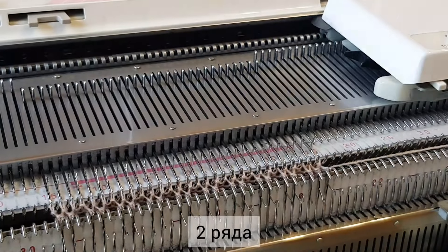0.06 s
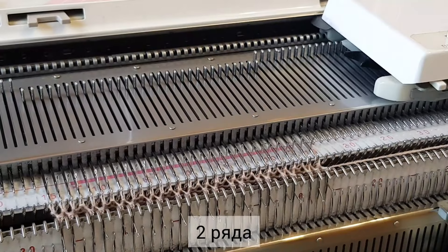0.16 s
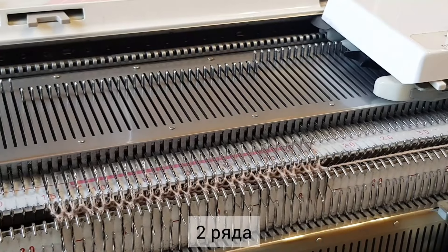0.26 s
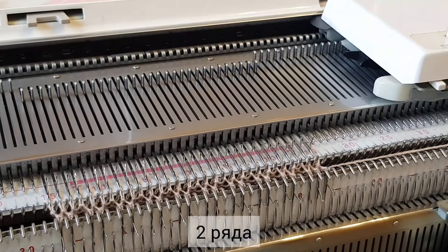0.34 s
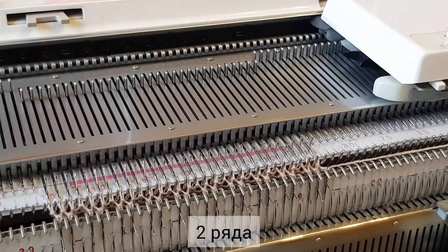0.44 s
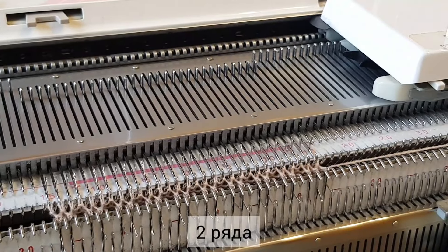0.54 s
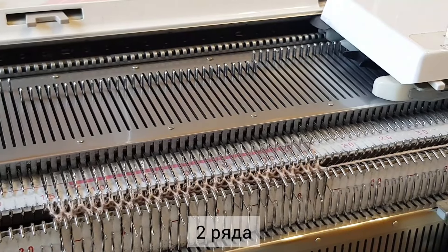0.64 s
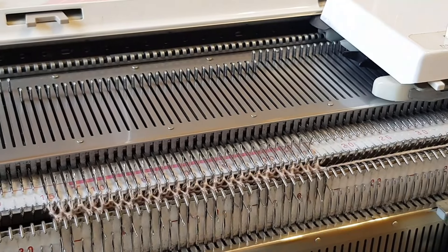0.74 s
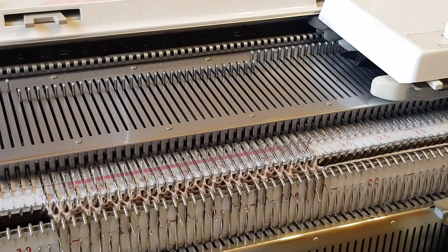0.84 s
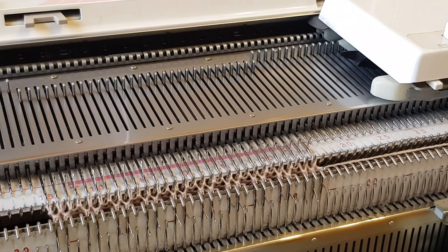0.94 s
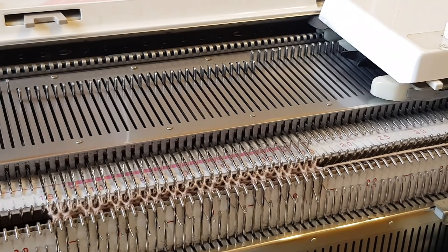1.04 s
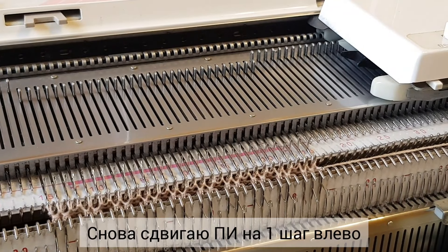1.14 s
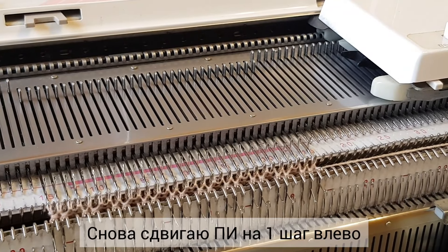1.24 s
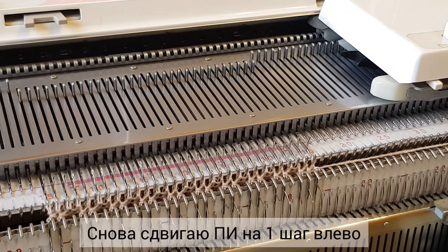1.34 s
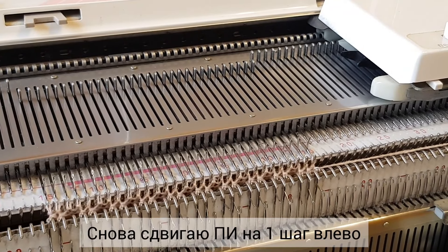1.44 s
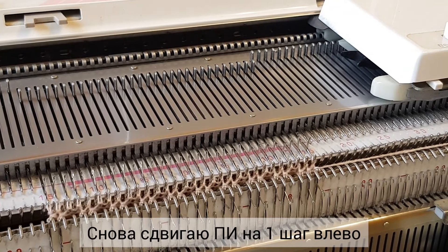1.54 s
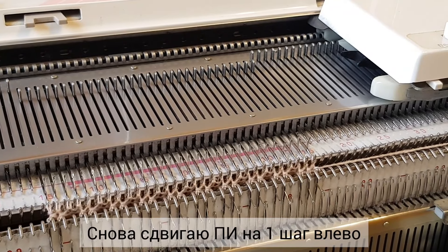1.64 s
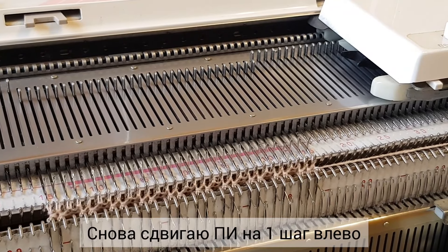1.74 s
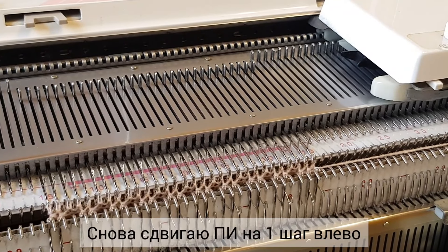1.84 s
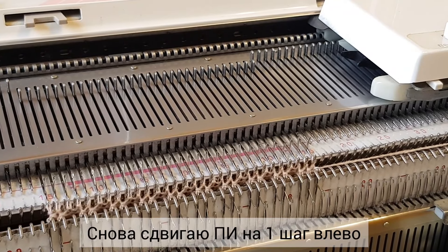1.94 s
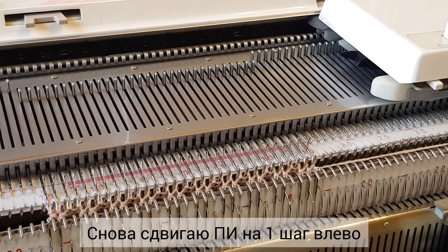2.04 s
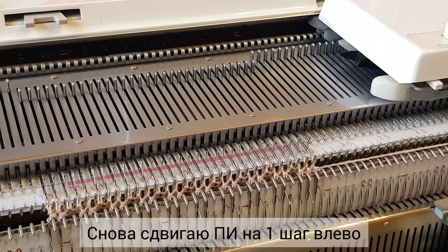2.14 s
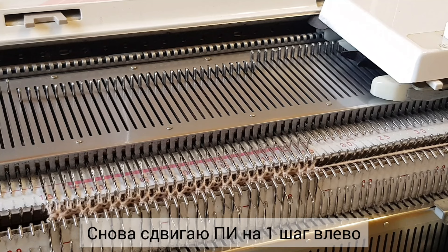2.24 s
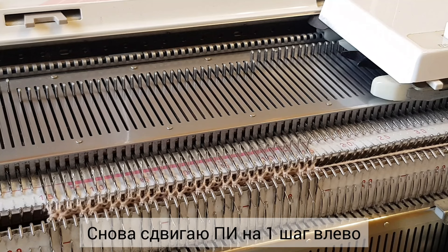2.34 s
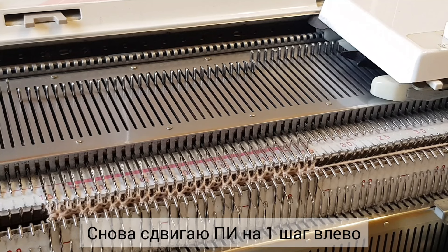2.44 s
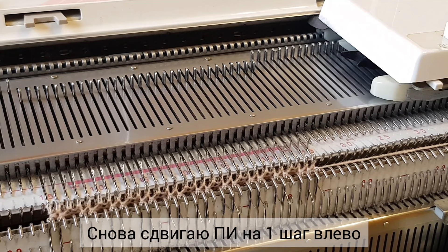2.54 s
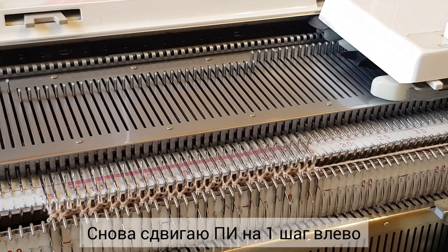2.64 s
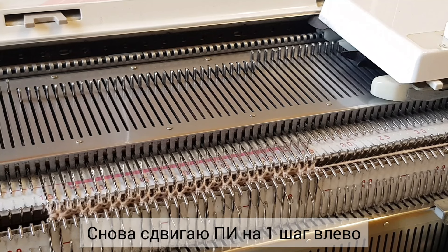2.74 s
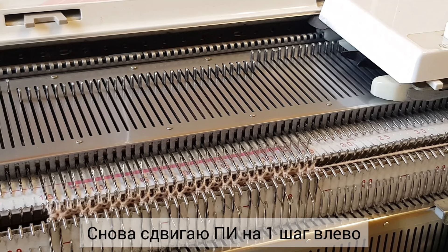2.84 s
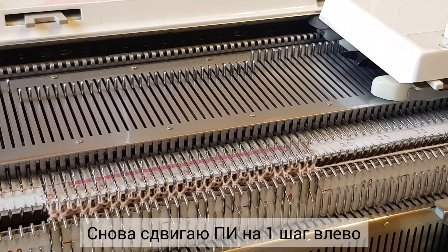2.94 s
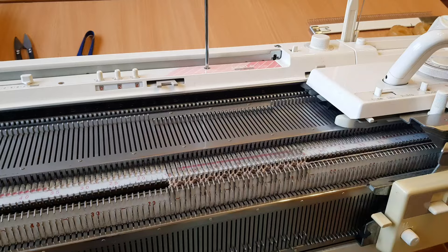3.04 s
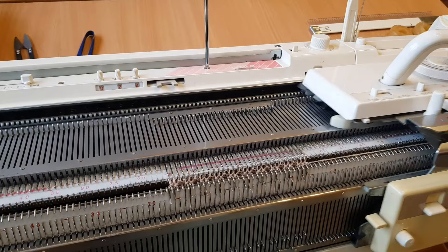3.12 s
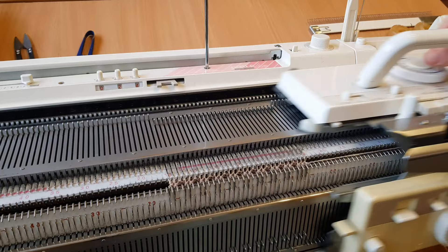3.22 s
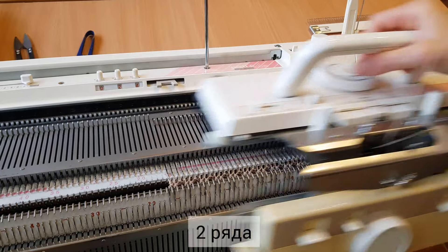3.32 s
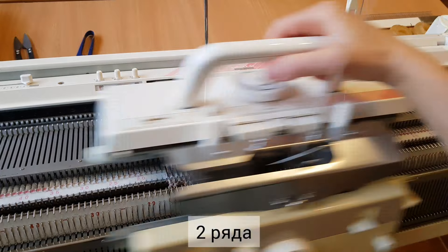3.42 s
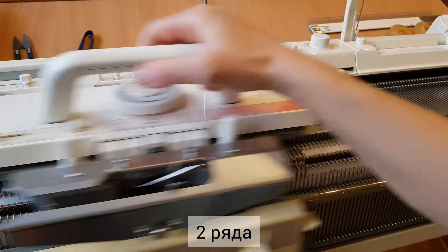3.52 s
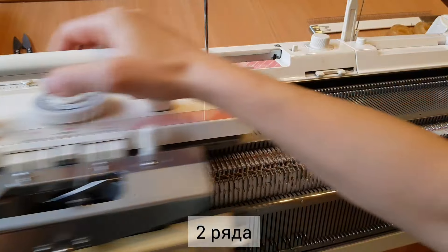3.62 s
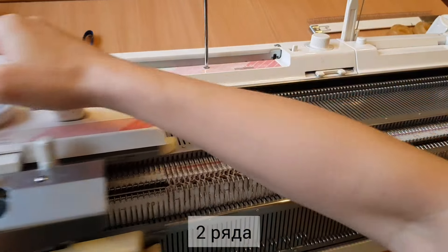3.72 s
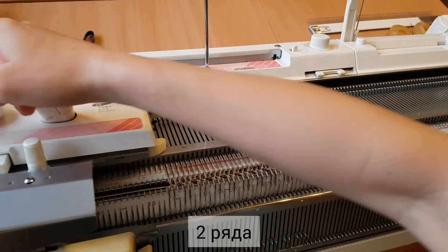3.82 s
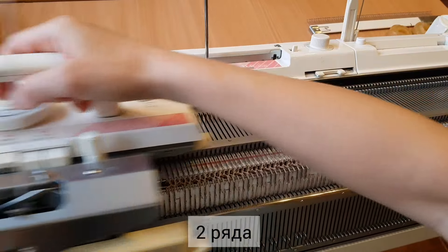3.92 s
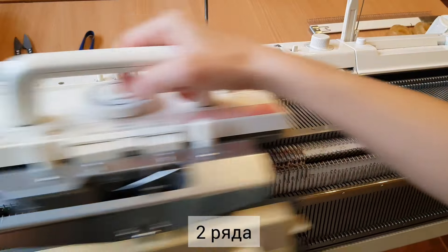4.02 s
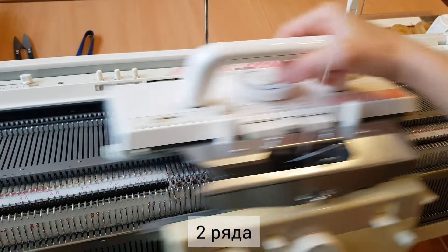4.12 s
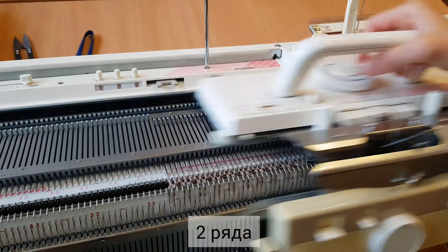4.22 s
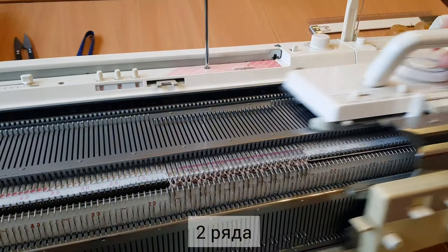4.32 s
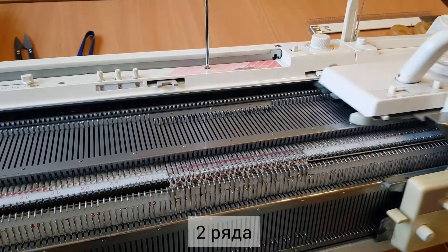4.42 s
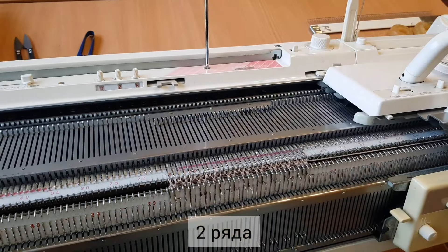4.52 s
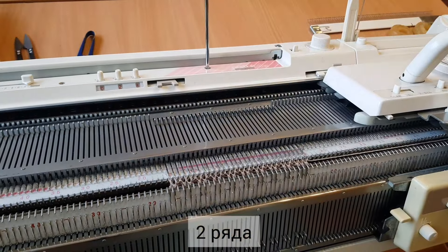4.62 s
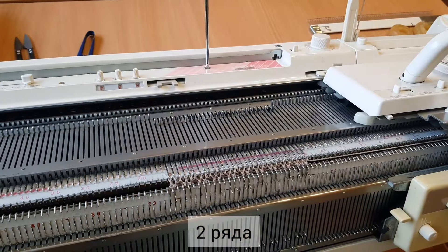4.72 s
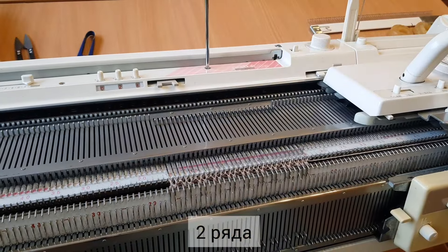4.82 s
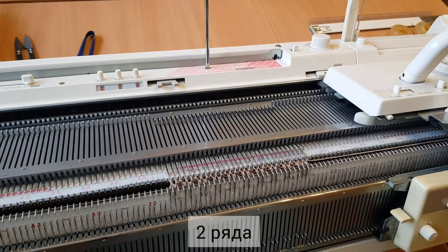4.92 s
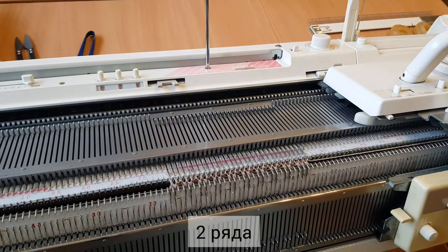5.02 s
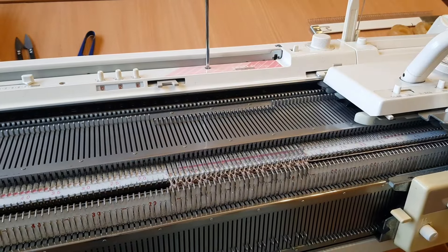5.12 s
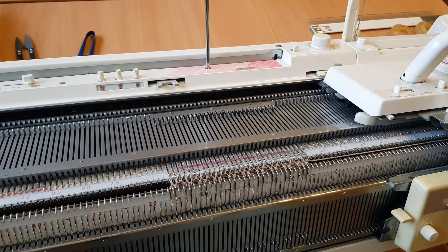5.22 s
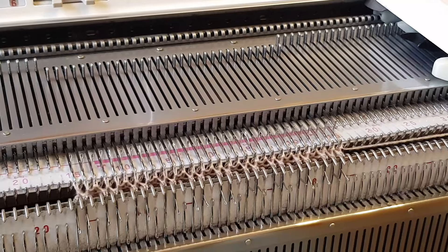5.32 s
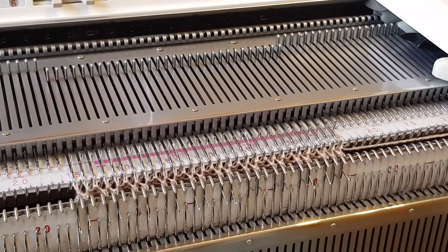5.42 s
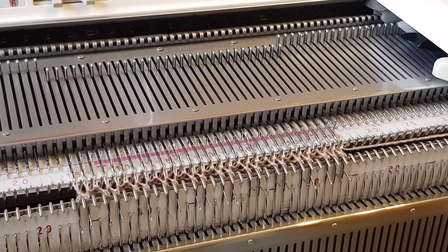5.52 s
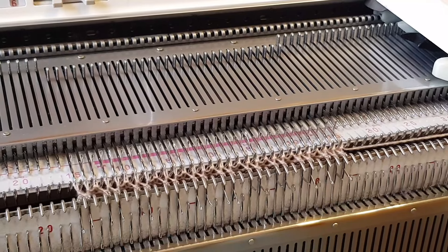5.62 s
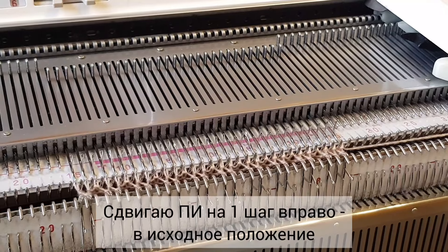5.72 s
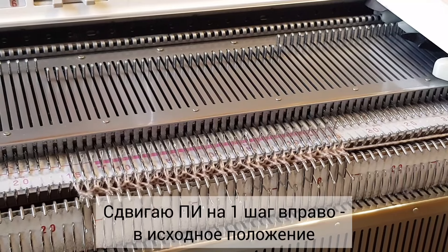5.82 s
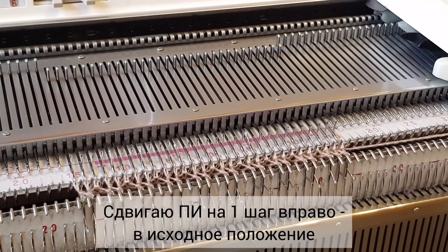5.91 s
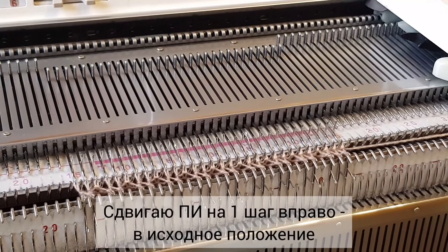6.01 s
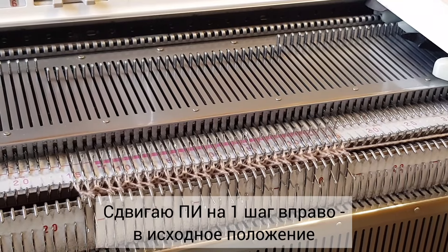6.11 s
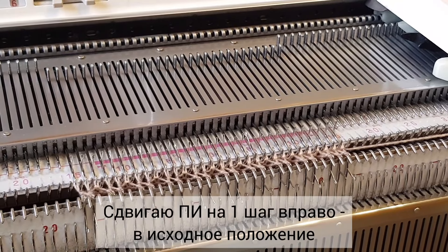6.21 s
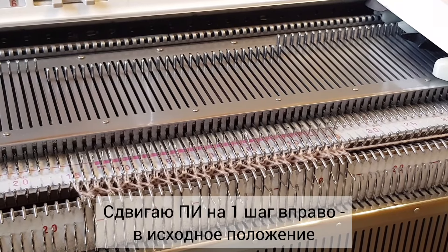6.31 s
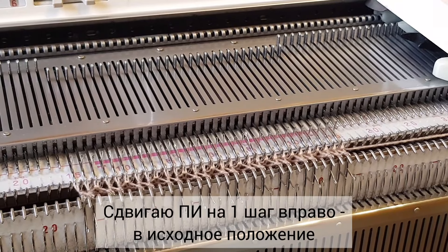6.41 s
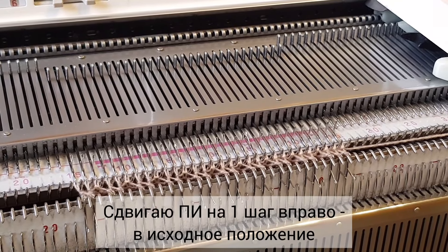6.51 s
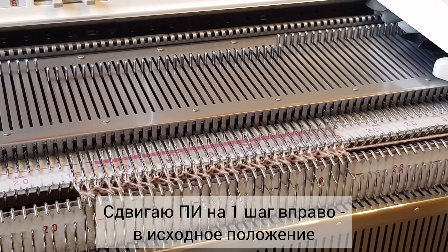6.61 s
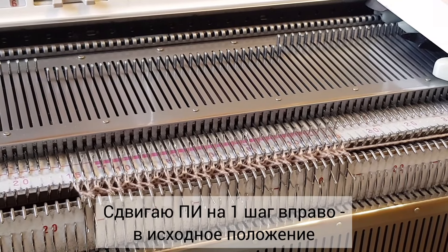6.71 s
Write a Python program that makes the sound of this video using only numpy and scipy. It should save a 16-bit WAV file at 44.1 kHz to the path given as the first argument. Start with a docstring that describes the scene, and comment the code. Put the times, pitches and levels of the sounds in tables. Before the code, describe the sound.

A knitting machine's bed clunks over one notch, its carriage rasps loudly across and back, then a fainter clunk follows in a quiet room.

```python
"""A double-bed knitting machine in a quiet room, close to a microphone with two ports.
The carriage runs out its last pass, then crosses and returns: random needle contacts ring steel cams and shell,
and shaken resonators make the rumble of the beds. Latches tick, and two close sines ring on as a spring.
Before and after the two full passes the bed is racked one notch: decaying noise and struck modes make the clunk.
Room tone and a late drone lie behind; three silences of about 40 ms part four stretches of differing room tone."""
import sys
import numpy as np
from scipy import signal
from scipy.fft import rfft, irfft, next_fast_len
from scipy.io import wavfile
from scipy.ndimage import uniform_filter1d

SR = 44100
rng = np.random.default_rng(int(sys.argv[2]) if len(sys.argv) > 2 else 0)


def store_wav(level_fs):
    """Save 16-bit WAV to argv[1]."""
    pcm = np.round(np.clip(np.atleast_2d(level_fs), -1, 1) * 32767)
    wavfile.write(sys.argv[1], SR, pcm.T.astype(np.int16))


N = 298097
TIME = np.arange(N) / SR   # s

# Colour of a needle butt hitting a steel cam. Each row: frequency in Hz, level in dB per Hz.
NEEDLE_COLOUR = [(1500, -14), (2400, -5), (3250, -3), (3800, -9), (4500, -5), (5050, -5), (6700, -9),
                 (8100, -10.5), (9400, -3.5), (11800, -2.5), (13500, -2), (16000, -5)]
# Modes of the two long needle beds. Each row: frequency in Hz, level in dB, t60 in seconds when struck.
BED_MODES = [(54, -6, .5), (70, -8, 0.43), (90.76, -8.5, .25), (123.5, 1, 0.35), (170, -1, 0.35),
             (203.3, -2, 0.53), (277, -9.5, .4), (334, -10.5, 0.36), (382.4, -11, .35), (455, -17, 0.3),
             (554, -20.5, .28), (783, -18.5, .3), (1210, -25, .25), (1790, -30, 0.29), (2094, -28.5, .22),
             (2490, -25.5, 0.22)]
# Passes of the carriage, the first already ending. Each row: sets off, meets the needles, hardest push,
# leaves the needles and stops, all in seconds; rattle in dB on setting off, running free and at the push;
# build-up in dB per second, deepest rumble in seconds, rumble in dB.
CARRIAGE_PASSES = [(-0.5, -0.38, -0.3, -0.15, 0.075, -70, -40, -19, 80, -0.2, -28),
                   (3.17, 3.382, 3.457, 3.668, 3.835, -71, -35.5, -18, 62, 3.612, -28.5),
                   (3.935, 4.039, 4.128, 4.26, 4.48, -57, -47, -17.2, 125, 4.15, -31)]


def from_db(db):
    """Decibels to gain."""
    return 10 ** (np.asarray(db) / 20)


def at_hz(points, hz):
    """Read a table along log frequency."""
    known, values = np.transpose(points)
    return np.interp(np.log(np.maximum(hz, 1)), np.log(known), values)


def in_time(rows):
    """One curve for each column after the times."""
    s, *columns = np.transpose(rows)
    return [np.interp(TIME, s, c) for c in columns]


def past(seconds):
    """Time gone by, zero while still to come."""
    return np.maximum(seconds, 0)


def dying(t, t60):
    """Exponential decay that has lost 60 dB after t60 seconds."""
    return np.exp(-np.log(1000) * t / t60)


def impulses(times, db):
    """One click at each time."""
    out = np.zeros(N)
    places = np.clip(np.asarray(times) * SR, 0, N - 1).astype(int)
    np.add.at(out, places, from_db(db))
    return out


def convolve(x, response):
    """Play a mono signal through a stereo response."""
    return np.array([signal.oaconvolve(x, r)[:N] for r in response])


def noise(spectrum, size=N):
    """Stereo noise of rms 1, most alike at the two ports in the bass, with skirts beyond its spectrum."""
    # Likeness of the two microphone ports. Each row: frequency in Hz, correlation from 0 to 1.
    likeness = [(60, .975), (125, .93), (250, .83), (550, .3), (1200, .2), (2500, 0), (16000, 0)]
    n = next_fast_len(size)
    hz = np.arange(n // 2 + 1) * SR / n
    mid, side = rfft(rng.standard_normal((2, n)))
    alike = np.clip(at_hz(likeness, hz), -1, 1)
    both = np.sqrt(1 + alike) * mid + np.sqrt(1 - alike) * side * [[1], [-1]]
    low_skirt = np.minimum(hz / spectrum[0][0], 1) ** 2
    high_skirt = np.maximum(hz / spectrum[-1][0], 1) ** 2
    shape = low_skirt / high_skirt * from_db(at_hz(spectrum, hz))
    out = irfft(both * shape, n)[:, :size]
    return out / out.std()


def impact(spectrum, t60, room_db):
    """A contact rings the crowded modes of the metal as decaying noise; the room dies at its own rate per band."""
    # Decay of the room. Each row: frequency in Hz, t60 in seconds.
    room_t60 = [(100, .45), (500, .5), (2500, 0.36), (6000, 0.23), (14000, 0.29)]
    t = TIME[:SR * 2 // 3]
    hz = np.arange(len(t) // 2 + 1) * SR / len(t)
    diffuse, tail = rfft(noise(spectrum, size=len(t))), 0
    centres, decays = np.transpose(room_t60)
    # overlapping bands that add up to the whole spectrum
    for share, decay in zip(np.eye(len(centres)), decays):
        band = irfft(diffuse * at_hz(np.c_[centres, share], hz), len(t))
        tail = tail + band * dying(t, decay)
    direct = noise(spectrum, size=len(t)) * dying(t, t60)
    onset = 1 - np.exp(-t / 0.0092)   # the room answers gradually
    return direct + from_db(room_db) * tail * onset


def ring(clicks, hz, t60):
    """A two-pole resonator: a unit click sets a decaying sine of height 1 ringing."""
    r, w = np.exp(-np.log(1000) / (t60 * SR)), 2 * np.pi * hz / SR
    # the tiny offset keeps the filter clear of slow, vanishing numbers
    return signal.lfilter([0, np.sin(w)], [1, -2 * r * np.cos(w), r * r], clicks + 1e-18)


def struck(times, db, modes, vary_db, spread):
    """Every blow stirs each mode with its own strength; one port hears it up to spread seconds later."""
    out = np.zeros((2, N))
    for k, (hz, mode_db, t60) in enumerate(modes):
        blow_db = db + mode_db + vary_db * rng.standard_normal(len(times))
        tone = ring(impulses(times, blow_db), hz, t60) * (-1) ** k
        lag = int(rng.random() * spread * SR)
        out[k % 2] += tone
        out[1 - k % 2, lag:] += tone[:N - lag]
    return out


def rattle(per_s, spectrum, t60, room_db, uneven_db, count):
    """Random contacts dealt to several cams that each ring in their own way; rms about 1."""
    sizes = from_db(uneven_db * np.clip(rng.standard_normal(N), -2, 2))
    contacts = (rng.random(N) < per_s / SR) * rng.choice([-1, 1], N)
    # divided by the contact rate, so that density alone does not change the level
    clicks = contacts * sizes / np.sqrt(np.mean(sizes ** 2) * per_s / SR)
    cam = rng.integers(0, count, N)
    out = 0
    for k in range(count):
        response = impact(spectrum, t60, room_db)
        response = response / np.sqrt(np.sum(response ** 2) / 2)
        out = out + convolve(clicks * (cam == k), response)
    return out


def waver(hz):
    """Smooth chance of spread 1 that changes about hz times a second, one curve per port."""
    lowpass = signal.butter(2, hz, fs=SR, output="sos")
    slow = signal.sosfilt(lowpass, rng.standard_normal((2, N)))
    return slow / slow.std()


def drone():
    """A low drone of bass noise swells at the end."""
    # Each row: time in seconds, level in dB.
    swell = [(0, -97), (5.9, -93.5), (6.15, -56.5), (6.38, -61.5), (6.53, -47), (6.76, -57)]
    # Each row: frequency in Hz, level in dB per Hz.
    colour = [(20, -30), (42, -8.5), (57, 1.5), (72, -11), (110, -35), (300, -71)]
    level_db, = in_time(swell)
    return from_db(level_db) * noise(colour)


def far_knocks():
    """Distant knocks arrive mostly as room sound: noise that swells and fades with no sharp edge."""
    # Soft knocks farther off in the room. Each row: start in seconds, level in dB.
    knocks = [(0.895, -55.5), (3.028, -62), (5.427, -50), (5.446, -45.5)]
    # Each row: frequency in Hz, level in dB per Hz.
    colour = [(120, -3.5), (170, 0), (260, -6.5), (400, 1), (850, 0.5), (1200, -3.5), (1700, -11.5),
              (3000, -20.5), (6500, -27.5)]
    t = TIME[:SR]
    swell = (1 - np.exp(-t / .005)) * dying(t, .25)
    return convolve(impulses(*np.transpose(knocks)), noise(colour, size=SR) * swell)


def spring():
    """Plucks ring two close modes that beat: a thin tone that hangs on and wavers unevenly at each port."""
    # Plucks of the spring. Each row: start in seconds, level in dB.
    pluck_rows = [(0.0, -62), (0.073, -64), (3.68, -58), (3.781, -60), (4.283, -54), (4.485, -71)]
    # The two close modes. Each row: frequency in Hz, level in dB, t60 in seconds.
    modes = [(4335, 0, .65), (4354, -10, .55)]
    plucks = impulses(*np.transpose(pluck_rows))
    tone = sum(from_db(db) * ring(plucks, hz, t60) for hz, db, t60 in modes)
    flutter_db = 3.5 * waver(22)
    return tone * from_db(flutter_db) * from_db([[1.5], [-2.5]])   # stronger at the left port


def ticking(times, db):
    """Thin bright ticks of single needles, as short bursts of decaying noise."""
    # Each row: frequency in Hz, level in dB per Hz.
    colour = [(2500, -23), (5500, -3.5), (7500, -4), (10000, 0.5), (14500, 2), (16000, -3)]
    return convolve(impulses(times, db), impact(colour, t60=0.022, room_db=-10.5))


def latches():
    """Small steel parts snap over and ring briefly in noise and clear tones; single needles tick."""
    # Latches snapping over. Each row: start in seconds, snap in dB, ring in dB.
    latch_rows = [(0.072, -77, -50), (1.332, -58, -43), (3.068, -65, -51), (3.6802, -17.5, -27),
                  (3.683, -18.5, -34.5), (3.781, -38, -44), (4.283, -28, -31), (5.9463, -58, -48)]
    # Colour of a latch with its resonances. Each row: frequency in Hz, level in dB per Hz.
    colour = [(1800, -9.5), (3000, -3), (3700, 2), (4200, -6), (4900, 0), (5400, -6.5), (5900, 1),
              (7500, -18), (8500, -12.5), (9020, 6.5), (9600, -10.5), (10500, -6), (11700, -19),
              (13000, -2), (14000, -16)]
    # Clear tones of a latch. Each row: frequency in Hz, level in dB, t60 in seconds.
    clear_tones = [(2970, -13, 0.056), (3720, -13, 0.09), (5800, -23, 0.13), (8960, -13, 0.068),
                   (13030, -17, 0.05)]
    # Single needles and catches that stand out. Each row: start in seconds, level in dB.
    tick_rows = [(1.2415, -61), (1.284, -54), (1.2925, -45.5), (1.3175, -47), (3.1812, -52), (3.199, -52),
                 (3.281, -49), (3.331, -39), (3.902, -63), (5.61, -62)]
    s, snap_db, ring_db = np.transpose(latch_rows)
    snaps = convolve(impulses(s, snap_db), impact(NEEDLE_COLOUR, t60=0.016, room_db=-26))
    rings = convolve(impulses(s, ring_db), impact(colour, t60=0.042, room_db=-15.5))
    tones = struck(s, ring_db, clear_tones, vary_db=3, spread=.0002)
    ticks = ticking(*np.transpose(tick_rows))
    return snaps + rings + tones + ticks


def racking():
    """The bed jumps a notch or is jolted: a crack of steel, a knock of the frame and a thud that lingers."""
    # The bed is racked one notch. Each row: start in seconds; bright crack, dull knock and bed thud in dB.
    racks = [(1.3162, -41, -37, -32), (5.9463, -43, -40, -40)]
    # Within each racking the detent lets go, the bed lands, then rebounds twice.
    # Each row: delay in seconds; crack, knock and thud in dB, added to the racking's own.
    stroke = [(0, -1.5, -3.5, -11), (.0135, 0, 1, -.5), (.05, -20, -14, -1), (.081, -31, -22, -13)]
    # Further blows to the frame and carriage: handling knocks, and thuds as the carriage shoves off or stops.
    # Each row: start in seconds; crack, knock and thud in dB.
    jolts = [(0.073, -62, -62, -57), (0.857, -65, -68, -69), (1.306, -62, -58, -60), (3.085, -76, -58, -54),
             (3.222, -85, -52, -68), (3.92, -82, -68, -55), (4.25, -47, -31, -40), (5.425, -58, -67, -70)]
    # Colours of steel crack and frame knock. Each row: frequency in Hz, level in dB per Hz.
    crack_colour = [(600, -18.5), (1800, 6.5), (2550, 4), (2900, 0), (3300, 3), (4000, 0), (5500, 0.5),
                    (7700, -7), (9000, -7.5), (12000, -10.5), (16000, -14)]
    knock_colour = [(40, -9), (150, -13.5), (400, 5), (900, -3.5), (1400, -12), (2100, -22), (3200, -22.5),
                    (6000, -46)]
    bloom_db = -10.5   # the room's low answer, against the thud
    blows = [np.add(rack, step) for rack in racks for step in stroke] + list(jolts)
    s, crack_db, knock_db, thud_db = np.transpose(blows)
    crack = convolve(impulses(s, crack_db), impact(crack_colour, t60=0.046, room_db=-7.5))
    knock = convolve(impulses(s, knock_db), impact(knock_colour, t60=0.18, room_db=-12))
    thud = struck(s, thud_db, BED_MODES, vary_db=1, spread=.0002)
    bloom = noise([(45, 1), (130, 3.5), (210, 0), (400, -17.5)], size=SR) * dying(TIME[:SR], .85)
    return crack + knock + thud + convolve(impulses(s, thud_db + bloom_db), bloom)


def travel():
    """Rattle and rumble in dB: a pass runs up freely, bites into the needles, builds to a push, eases, runs out."""
    ease = 54   # dB per s, the hand eases off after the hardest push
    engage, release = 1100, 400   # dB per s, the cams run into and out of the working needles
    creep_db, halt = -76, 400   # rattle as the carriage comes to rest; dB per s, fading once it stands
    roll_db, settle_db = -61, -64   # rumble of the beds on the run-up and at the stop
    rattles, rumbles = [], []
    for start, meet, push, leave, stop, shove_db, free_db, top_db, build, deepest, rumble_db in CARRIAGE_PASSES:
        standing = halt * (past(start - TIME) + past(TIME - stop))
        effort = top_db - build * past(push - TIME) - ease * past(TIME - push)
        knitting = effort - engage * past(meet - TIME) - release * past(TIME - leave)
        run_up = np.interp(TIME, [start, meet], [0, 1]) ** 1.6   # gathers speed slowly at first
        run_out = np.interp(TIME, [leave, stop], [0, 1])
        free = shove_db + (free_db - shove_db) * run_up + (creep_db - free_db) * run_out
        rattles.append(np.maximum(knitting, free - standing))
        rolling = np.interp(TIME, [meet, deepest, stop], [roll_db, rumble_db, settle_db])
        rumbles.append(rolling - standing)
    return np.maximum(np.max(rattles, axis=0), -140), np.maximum(np.max(rumbles, axis=0), -140)


def over_bed(x, near_ms, far_ms, echo):
    """The steel bed mirrors the sound; the echo's lag follows the carriage, so notches sweep through the rasp."""
    # Where the carriage is on the bed. Each row: time in seconds, place (0 = before the microphone, 1 = right end).
    path = [(3.2, 0.78), (3.35, 0.81), (3.5, -0.32), (3.7, -0.83), (3.95, -0.96), (4.1, -.2), (4.27, 0.7),
            (4.4, 0.96)]
    place, = in_time(path)
    out = []
    for channel, port in zip(x, (-.15, .15)):
        nearness = 1 / np.hypot(1, 2 * (place - port))
        lag = (far_ms + (near_ms - far_ms) * nearness) * SR / 1000   # samples
        out.append(channel + echo * np.interp(np.arange(N) - lag, np.arange(N), channel))
    return np.array(out) / np.hypot(1, 0.92 * echo)


def ringing_cams(needle_db):
    """Scraping noise, as loud as the needles' effort, drives the ringing modes of the steel cams."""
    # Each row: frequency in Hz, level in dB, t60 in seconds.
    modes = [(1016, -2, .05), (1229, -1, 0.078), (2905, -0.5, .06), (3310, 1.5, .05), (3925, -8, .08),
             (4936, 1, .04), (5970, -3, .05), (6720, -5.5, .05), (7220, -4, .05), (8370, -3.5, .05),
             (8490, -2.5, 0.09), (10200, 2, 0.048), (11150, 4.5, .08), (11850, 1.5, .06), (13400, 2.5, .04),
             (15410, -0.5, .08)]
    cams_db = -8   # against the rattle
    scraping = noise([(500, 0.00083), (16000, 0.0092)]) * from_db(needle_db)
    return sum(from_db(db + cams_db) * ring(scraping, hz, t60) / np.sqrt(t60 * SR) for hz, db, t60 in modes)


def bed_rumble(rumble_db):
    """The long beds turn the carriage's shaking into a hollow rumble that swells and fades along its own curve."""
    # Force with which the running carriage shakes the beds. Each row: frequency in Hz, level in dB per Hz.
    force_colour = [(45, -17), (65, -10), (95, 2), (130, 3), (175, -2), (400, 0), (800, -3)]
    shaking = noise(force_colour)
    # under the carriage the modes die in half their struck time
    beds = sum((-1) ** k * from_db(db) * ring(shaking, hz, .5 * t60)
               for k, (hz, db, t60) in enumerate(BED_MODES))
    beds /= np.sqrt(uniform_filter1d(np.mean(beds ** 2, axis=0), size=2205) + 1e-12)   # level over 50 ms
    return from_db(rumble_db) * (beds + from_db(-10) * shaking)


def carriage():
    """The louder the needles strike, the thicker their contacts; cams, shell and beds resound."""
    # Colour of the carriage shell. Each row: frequency in Hz, level in dB per Hz.
    shell_colour = [(200, -25), (370, 4), (490, -6), (620, -1.5), (700, -4.5), (860, -3), (1020, 0),
                    (1500, -3.5), (2100, -5.5), (2700, -9.5), (4000, -29)]
    shell_top_db, shell_follows = -26, .85   # shell at the hardest push; its share of the rattle's swing in dB
    creep_hits, full_hits = 90, 1300   # needle contacts per s at a crawl, and added at the hardest push
    first_needle_db = -1   # tick of the first needle, against the rattle
    needle_db, rumble_db = travel()
    effort_db = needle_db - needle_db.max()
    shell_db = shell_top_db + shell_follows * effort_db
    per_s = creep_hits + full_hits * from_db(.5 * effort_db)
    needles = from_db(needle_db) * rattle(per_s, NEEDLE_COLOUR, t60=0.028, room_db=-15, uneven_db=1, count=4)
    shell = from_db(shell_db) * rattle(per_s, shell_colour, t60=.045, room_db=-13.5, uneven_db=3, count=3)
    rasp = over_bed(needles + shell + ringing_cams(needle_db), near_ms=1.3, far_ms=.3, echo=.4)
    meets = np.array(CARRIAGE_PASSES)[1:, 1]
    first_needles = ticking(meets, np.interp(meets, TIME, needle_db) + first_needle_db)
    return rasp + first_needles + bed_rumble(rumble_db)


def scene():
    """Machine over room tone and far rush, heard in stretches with short silences between."""
    # Unbroken stretches. Each row: start in seconds, end in seconds, room tone in dB, far rush in dB.
    stretches = [(0, 0.818, -68.5, -78.5), (0.853, 2.977, -61, -84), (3.016, 5.251, -68.5, -85),
                 (5.297, 6.802, -60, -70.5)]
    # Colours of room tone and far rush. Each row: frequency in Hz, level in dB per Hz.
    tone_colour = [(20, -12.5), (55, 1.5), (85, -12), (125, -2.5), (200, -1), (275, 3), (350, -10),
                   (700, -11.5), (1200, -23.5), (2300, -33.5), (5000, -37), (8200, -49), (11500, -35),
                   (15500, -33.5)]
    rush_colour = [(300, -19.5), (600, -4.5), (950, 0.5), (1250, -3.5), (1550, -4.5), (1800, -17),
                   (4000, -38)]
    tone, rush = noise(tone_colour), noise(rush_colour)
    sources = drone() + far_knocks() + spring() + latches() + racking() + carriage()
    heard = np.zeros((2, N))
    for start, end, tone_db, rush_db in stretches:
        fade = np.clip(np.minimum(TIME - start, end - TIME) / 0.001, 0, 1)   # 1 ms at each edge
        heard += fade * (sources + from_db(tone_db) * tone + from_db(rush_db) * rush)
    return heard


def record(dry):
    """The left port is nearer the machine and so louder; the top is cut steeply."""
    # Balance of the two microphone ports. Each row: frequency in Hz, left minus right in dB.
    balance = [(60, .8), (125, 1.8), (250, 1.3), (550, 3.6), (1100, 3.2), (2200, 1.8), (4500, 2),
               (8000, 2.8), (13000, 4)]
    cutoff_hz = 15900
    n = next_fast_len(N + SR // 10)
    hz = np.arange(n // 2 + 1) * SR / n
    port_gains = from_db(at_hz(balance, hz) * [[.5], [-.5]])
    tilted = irfft(rfft(dry, n) * port_gains, n)[:, :N]
    lowpass = signal.ellip(12, .1, 85, cutoff_hz, fs=SR, output="sos")
    return signal.sosfilt(lowpass, tilted)


dry = scene()
out = record(dry)
store_wav(out)
```